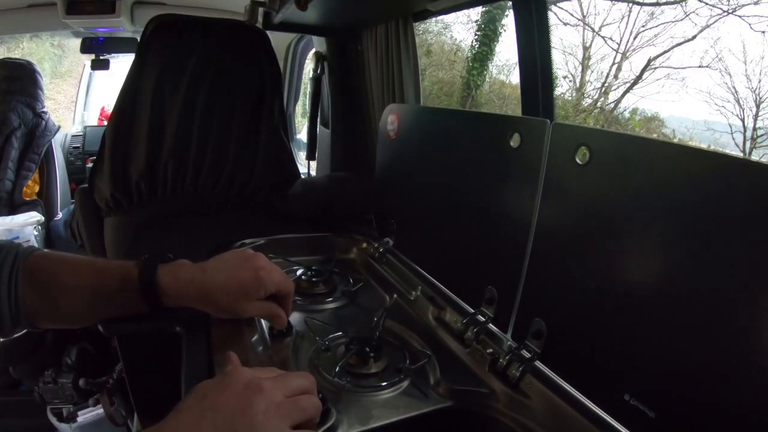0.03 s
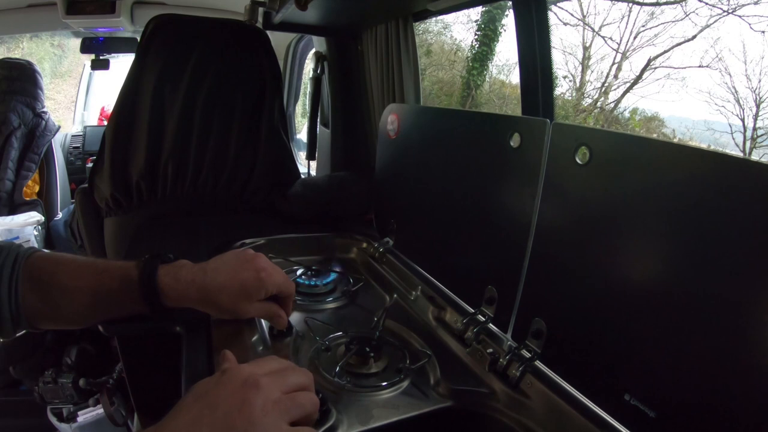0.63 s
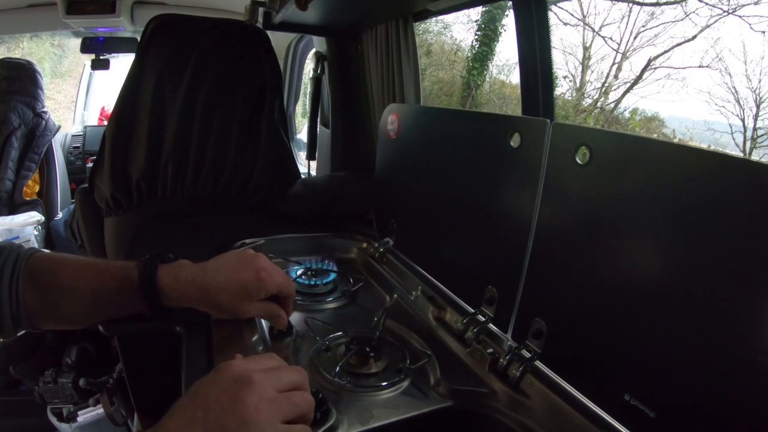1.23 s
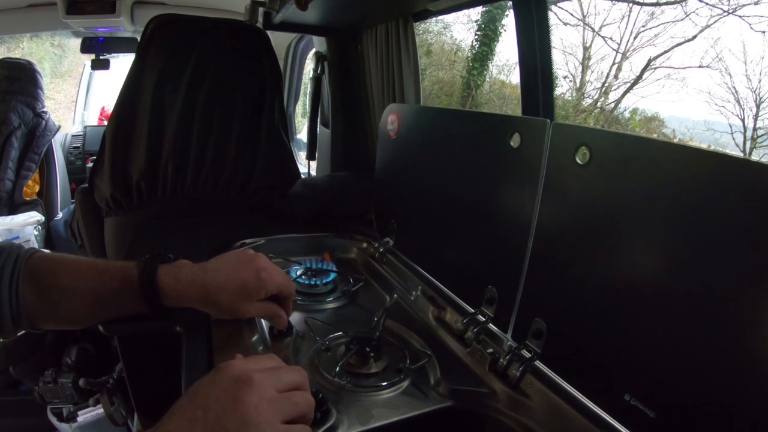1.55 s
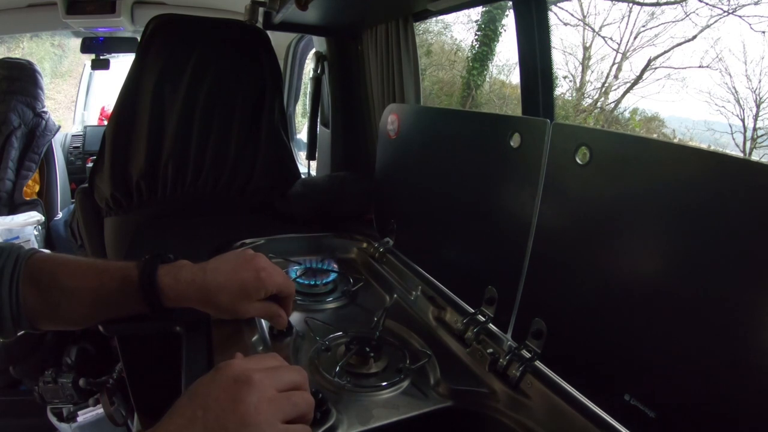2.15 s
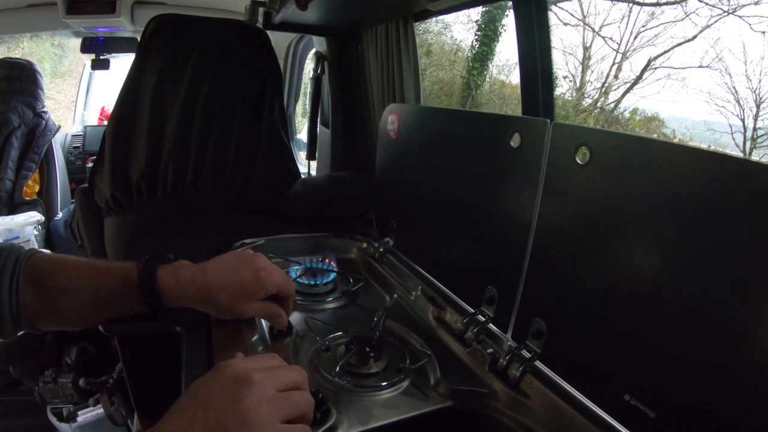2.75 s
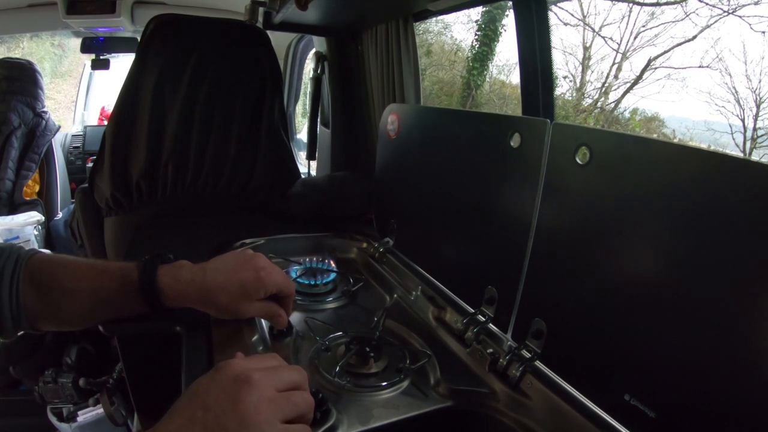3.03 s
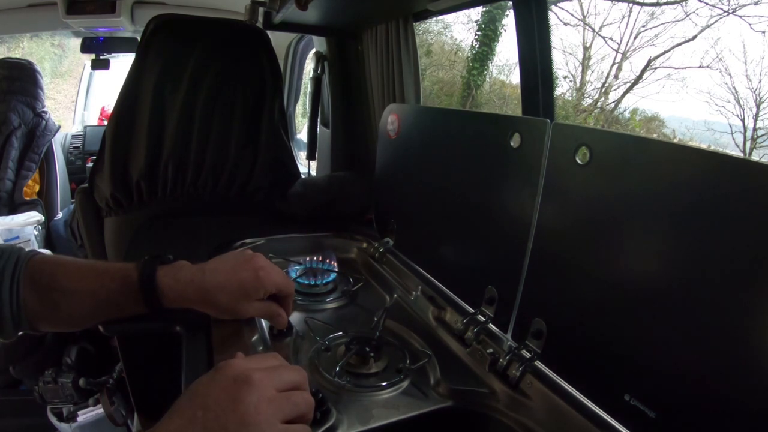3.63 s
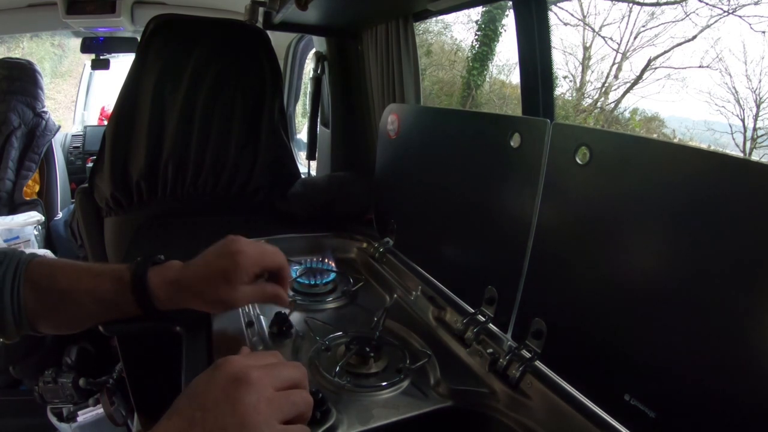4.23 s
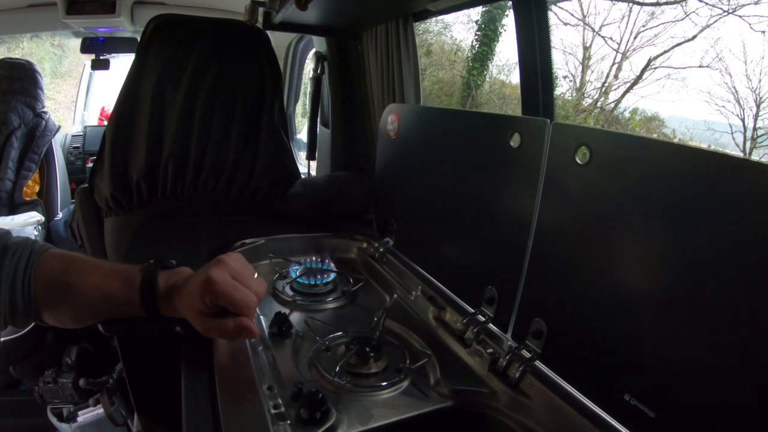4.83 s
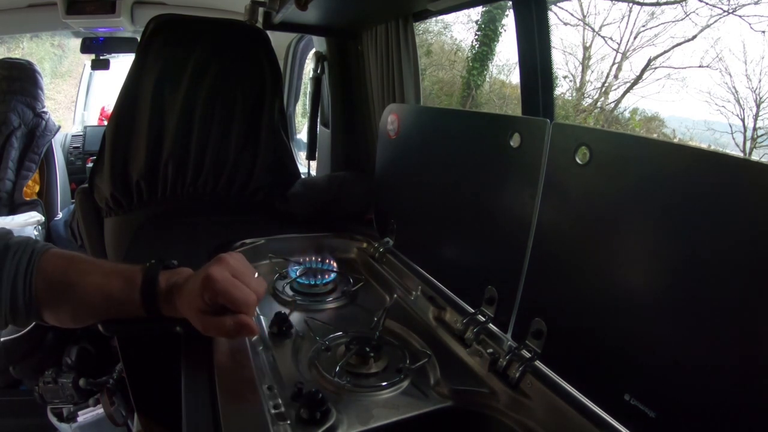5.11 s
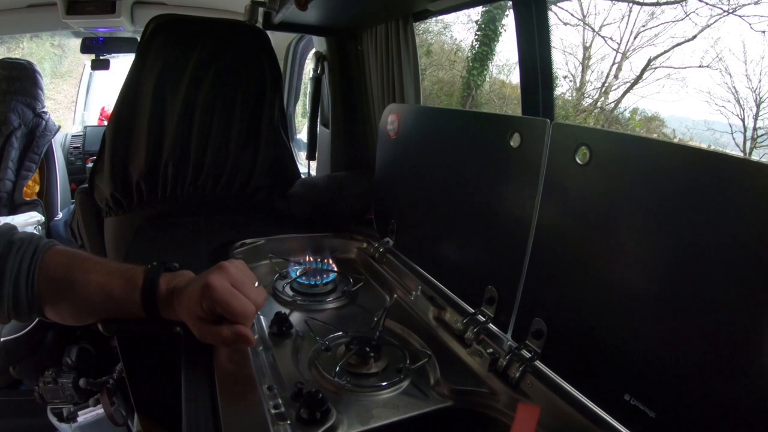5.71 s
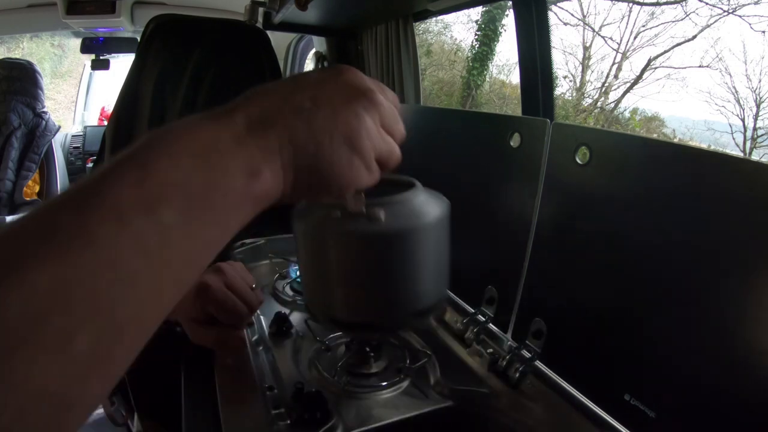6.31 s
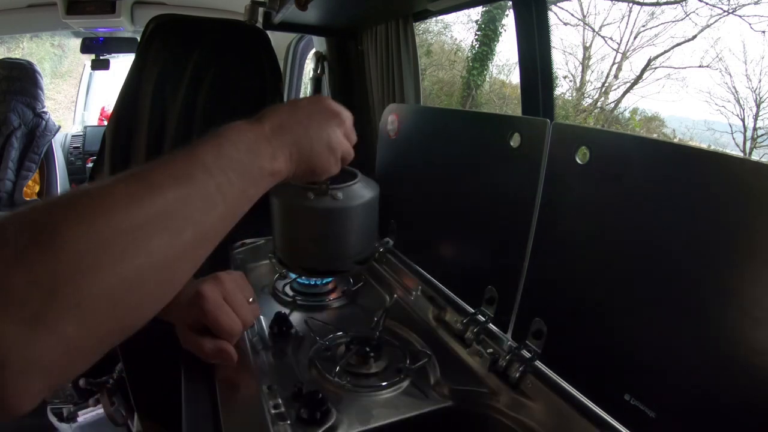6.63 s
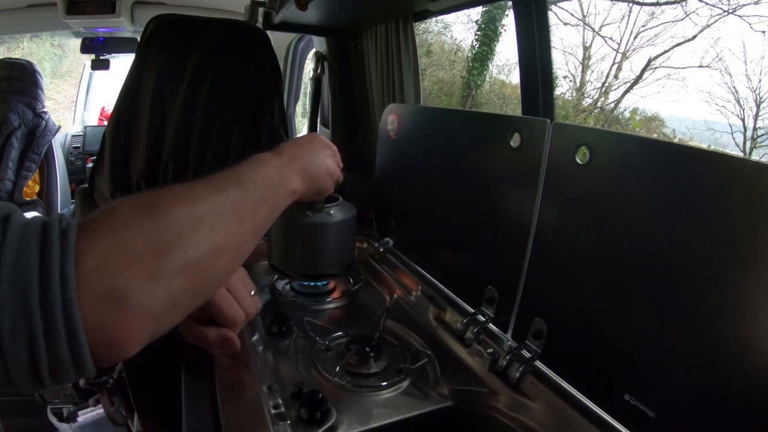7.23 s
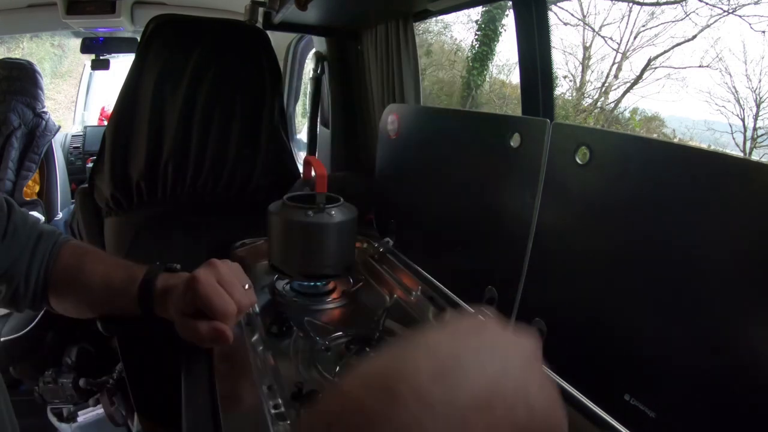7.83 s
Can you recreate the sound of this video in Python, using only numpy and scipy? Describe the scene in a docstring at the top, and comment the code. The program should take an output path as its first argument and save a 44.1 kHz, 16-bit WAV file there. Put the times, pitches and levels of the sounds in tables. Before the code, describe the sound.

Inside a parked van, a gas hob's igniter rasps and snaps loudly, then again more softly, ringing the steel top. The flame catches with dull pops and settles into a quiet hiss. A small bird repeats a faint two-note call outside. Close by on the right, a kettle is dragged, bumps twice and lifts with a wobbling metallic ring, then clatters down on the pan support.

```python
"""Lighting a gas hob in a van

Inside a parked van the igniter's spring rasps and snaps, and the steel hob top rings.
The flame pops as it catches, then settles to a hiss. A kettle of water is dragged closer on the
right, bumps the hob as it is lifted, rings with a wobble as the water sloshes, and clatters down
on the pan support. Small birds sing outside."""
import sys
import numpy as np
from scipy import signal
from scipy.fft import rfft, irfft, next_fast_len
from scipy.io import wavfile

SR = 44100
rng = np.random.default_rng(int(sys.argv[2]) if len(sys.argv) > 2 else 0)


def digitize_waveform(pressure):
    """Quantize a signal to 16-bit integers and store it at the path in sys.argv[1].

    Rows of a 2-D input are taken as channels; values are limited to [-1, 1].
    """
    field = np.atleast_2d(pressure).T
    bounded = np.clip(field, -1, 1)
    quanta = np.round(bounded * 32767).astype(np.int16)
    wavfile.write(sys.argv[1], SR, quanta)


N = 351477
T, CLOCK = np.arange(SR) / SR, np.arange(N) / SR  # seconds within one hit, and through the scene

# knocks: (time [s], clack [dB], thud [dB], thud pitch [Hz], treble tilt [dB/octave], ring [dB])
IGNITER_HITS = [(0.002, -33, -40.5, 172, -8, -48), (0.222, -45, -62, 200, -3.5, -72),
                (0.4625, -10.5, -12, 172.1, -1, -23.5), (0.477, -25.5, -20, 125, 2.5, -37),
                (0.689, -24.5, -43.5, 171, -1.5, -54), (0.6945, -20.5, -26.5, 125.1, -5.5, -33),
                (0.716, -34, -45, 170, -6, -37)]
KNOB_HITS = [(4.143, -56, -41, 176, -6.5, -71), (4.238, -53.5, -41.5, 159, -0.5, -64),
             (4.363, -55.5, -52, 191, 1, -72), (4.447, -49.5, -47, 194, 2, -64),
             (4.465, -50, -44.5, 410, -1, -74), (4.772, -51, -43.5, 130, 0.5, -58.5)]
DRAG_JOLTS = [(5.031, -62, -35.5, 185, 0, -67), (5.170, -48, -33, 188, 0, -62),
              (5.263, -43, -35, 170, -6, -49), (5.302, -48, -36, 210, -5, -58),
              (5.5235, -22.5, -36, 250, 0, -31)]
LEAD_IN_AND_BUMPS = [(5.862, -46, -48, 400, -7, -54), (5.8743, -16.5, -20, 195, -1.5, -35),
                     (5.9625, -17.5, -19, 205, -1.5, -37)]  # a faint, dull lead-in, then the kettle's two bumps
LANDING_HITS = [(7.031, -51, -46.5, 445, -6, -54.5), (7.0955, -25, -23.5, 165.6, 0.5, -38.5),
                (7.116, -37, -31, 178, -3, -46), (7.178, -32.5, -31, 178.3, -2, -41),
                (7.3035, -22.5, -27, 165, 2, -38), (7.326, -37, -31, 185, -1, -48),
                (7.3572, -22.5, -25.5, 83.5, 0, -35), (7.391, -31.5, -28.5, 102, -1, -49),
                (7.44, -51, -33, 85, 7, -74), (7.593, -53, -42.5, 156, -1, -65),
                (7.742, -57, -50.5, 189, -8, -65)]
# soft thumps as the knob is pushed in: (time [s], level [dB], pitch [Hz], rise [s])
PRESSES = [(.2595, -25, 189, 0.0043), (.279, -30, 171, .007), (.322, -27.5, 178, .011)]
# rubbing that swells until it lets go: (time [s], length [s], final level [dB])
SPRING_RASPS = [(0.416, .045, -11.7), (0.669, .021, -27)]
BASE_SCRAPE = (5.867, 0.092, -22)
# the hand brushing the knob and shoving the kettle: (time [s], length [s], level [dB])
BRUSHES = [(.322, .04, -52), (4.205, .045, -62.5), (4.285, 0.033, -59.5), (4.405, 0.068, -59.5)]
SHOVES = [(4.755, 0.052, -48.5), (4.86, 0.27, -49), (5.144, .19, -38), (5.348, 0.2, -34.2)]
# tone colour of knocks, rubbing and the shaking cabinet: (frequency [Hz], level [dB])
SNAP = [(40, -50), (150, -29), (250, -1), (318, -10), (425, -2.5), (589, -21), (774, -4.5), (1000, -5),
        (1700, -9), (2800, -11), (4600, -13.5), (6150, -26), (8520, -23.5), (9610, -41), (15000, -54)]
BUMP = [(40, -40), (150, -22), (260, -3), (430, -3), (570, -11), (740, 0), (1200, -5.5), (2700, -13.5),
        (4200, -12.5), (7200, -15.5), (10000, -26.5), (11500, -40), (15000, -48.5)]
CLANK = [(150, -26), (250, 2), (411, -9), (540, 0.5), (900, -2.5), (1190, -9), (1850, -10.5), (2700, -13),
         (3200, -7.5), (4520, -6), (6150, -4.5), (9500, -22.5), (11500, -44), (15000, -53)]
DRAG = [(40, -6), (150, -14), (280, -4), (520, -8), (850, -11.5), (1350, -3.5), (2000, -5), (3200, -14.5),
        (5600, -7), (9600, -20), (11500, -38), (15000, -47)]
JUDDER = [(20, -18), (45, -7), (100, -10), (180, 0), (300, -6), (500, -17), (1500, -70)]
# short resonances of the struck parts: (pitch [Hz], width [Hz], level [dB])
SNAP_PEAKS = [(780, 98, -3), (1450, 30, -7), (1729, 52, -8), (2480, 80, -11), (3525, 50, -5),
              (4085, 40, -4), (4930, 60, -5), (7900, 42, -17), (8570, 40, -14)]
BUMP_PEAKS = [(1410, 35, -7), (1850, 35, -1), (2280, 60, -4), (2960, 40, -6), (3465, 45, -1)]
CLANK_PEAKS = [(924, 45, 4.5), (1510, 41, -3), (4130, 28, -3), (4980, 40, -8)]
# modes, the notes metal rings at; t60 is the time to fade 60 dB: (pitch [Hz], level [dB], t60 [s])
HOB_MODES = [(118.5, -4, .45), (179, 4.5, .25), (418.7, 1, .17), (662, -1.5, .68), (768, -3, .38),
             (806, -8.5, .85), (888, -13.5, .85), (980, -6, .13), (1078, -10, .5), (1281, -17, .45),
             (1739, -5, .11), (1905, -17, .3), (2229, -27, .55), (2772, -28, .5), (3580, -27, .42)]
SUPPORT_MODES = [(80, .5, .7), (178.4, 4, .25), (335, -3, .24), (670, -6, .25), (933, -1, .3),
                 (1495, -6.5, .24), (1850, -7, .2), (3671, -5, .2), (4350, -8, .22), (4625, -9, .19),
                 (6050, -2, .12)]
KETTLE_ON_HOB_MODES = [(641, -8, .24), (1410, -2.5, .19), (1700, -4, .1), (1940, 2, .09), (2350, -1.5, .19),
                       (4030, -10, .12), (4620, -8, .11), (5570, -6, .17)]
# the lifted kettle's walls: (pitch [Hz], level [dB], t60 [s], swing [Hz], time of top pitch [s])
WALL_MODES = [(1400, -41, 1.1, 115, 6.30), (1680, -31, .24, 70, 6.08), (1930, -29.5, .38, 150, 6.11),
              (2400, -47, .75, 35, 6.15), (3360, -41, .34, 60, 6.17), (4190, -45, .32, 60, 6.02),
              (5200, -44, .18, 30, 6.02)]

# dull pops and sharp spits of the catching flame: (time [s], level [dB])
POPS = [(0.508, -22), (0.548, -24.5), (0.618, -28.5), (0.733, -27), (0.798, -31), (0.840, -28.5),
        (0.875, -28), (0.897, -35.5), (0.934, -27.5), (1.000, -34.5), (1.030, -32), (1.062, -40)]
SPITS = [(.842, -37), (.875, -43), (.901, -43.5), (.9425, -42), (1.002, -42), (1.032, -44)]
# tone colour of the burner's three noises: (frequency [Hz], level [dB])
ROAR = [(12, -54), (20, -21.5), (32, -25), (65, -10), (102, -16.5), (160, 1), (211, -4), (270, -23),
        (450, -41), (990, -120)]
HISS = [(190, -36.5), (330, -11.5), (450, -16), (611, -16), (729, -2.5), (977, -12), (1680, 4.5),
        (1890, 1.5), (2950, -13), (3550, -5.5), (4060, -9), (5200, -22.5), (9640, -38.5), (11000, -46),
        (14300, -80), (22000, -120)]
FIZZ = [(3200, -9), (6300, -1), (7400, -7), (9500, -2), (10800, -25.5), (15000, -32)]
# roar, hiss, fizz: (base level [dB], change once settled [dB], when screened [dB], when covered [dB])
FLAME_LEVELS = [(-53.5, -5.5, -5.5, -2), (-61.2, .5, -2.5, 3), (-86.5, 15, -4, 3)]
# the hiss and fizz dip after the loud snap, then recover: (time [s], level change [dB])
HISS_DUCKING = [(0, 7), (.4, 6), (1.1, -5), (1.6, 1), (2.6, -0.5)]
# thin whistles of the cold jet: (time [s], length [s], pitch [Hz], width [Hz], level [dB])
JET_WHISTLES = [(.75, 1.3, 7760, 160, -91), (.8, 1.4, 8750, 110, -95), (.4, 3.4, 3500, 200, -78)]

# one bird's two-note calls: (time [s], second note's pitch [Hz], relative level [dB])
CALLS = [(2.835, 2952, -48), (3.297, 3076, -42.5), (3.832, 3090, -41), (4.402, 3070, -42.5),
         (4.95, 3100, -41)]
# other birds' notes: (time [s], pitch [Hz], relative level [dB], length [s])
FALLING_NOTES = [(s, 5130, -72, .087) for s in (2.875, 3.02, 3.18, 3.33, 3.505)]
WHISTLE_NOTES = [(1.58, 4030, -62, 0.045), (2.23, 4340, -54, .09), (2.48, 4050, -58, 0.079)]
BUZZ_NOTES = [(1.49, 3500, -67, .06), (1.62, 3570, -63, .065), (1.78, 3900, -65, .06),
              (6.18, 3570, -51, .1), (6.52, 5240, -56.5, .06), (6.753, 3490, -43, 0.081)]

# how long sound lingers in the van: (frequency [Hz], t60 [s])
CABIN_DECAY = [(150, 0.39), (400, .14), (1000, .24), (2500, 0.35), (5000, .2), (9000, 0.068), (15000, .14)]
# how alike left and right are: (frequency [Hz], likeness [0-1])
LIKENESS = [(100, 0.7), (400, 0.9), (800, 0.5), (1500, 0.3), (5000, .35), (10000, 0.1)]
# stereo spread, mono at first: (time [s], width [0-1])
STEREO_WIDTH = [(1.3, 0), (3.0, 1)]


def igniter():
    """The knob goes in; the spring rasps, snaps and bounces back; later the hand brushes away."""
    sound = knocks(IGNITER_HITS, SNAP, SNAP_PEAKS, HOB_MODES, peak_db=6, hold_s=.0057, fall_s=.007,
                   tail_db=-14.5, clunk_db=-8, clunk_hz=743.8, thud_rise_s=.0041, boom_db=-5.5)
    sound += knocks(KNOB_HITS, SNAP, (), HOB_MODES, peak_db=0, hold_s=.0057, fall_s=.01,
                    tail_db=-6, clunk_db=-7, clunk_hz=420, thud_rise_s=.0049, boom_db=-5)
    loading = swells(SPRING_RASPS, power=3.1, stop_db_per_s=1800)
    sound += rub(loading, SNAP, SNAP_PEAKS, peak_db=11, tilt_db=2.5, grain_db=1.5, grain_hz=500)
    brushing = strokes(BRUSHES, rise_s=.017, sag_db_per_s=30, stop_db_per_s=300)
    sound += rub(brushing, DRAG, tilt_db=1, grain_db=2, grain_hz=250)
    for s, db, hz, rise_s in PRESSES:
        add(sound, s, amp(db) * thud(hz, rise_s, boom_db=-13.5, boom_t60=.44))
    return sound


def flame_catching(first_hz=122, last_hz=174):
    """The flame pops and spits as it runs round the ring; the pops climb in pitch as it settles."""
    sound = np.zeros((2, N))
    for s, db in POPS:
        progress = (s - POPS[0][0]) / (POPS[-1][0] - POPS[0][0])
        hz = first_hz + (last_hz - first_hz) * progress ** 4.2
        add(sound, s, amp(db) * thud(hz, rise_s=.005, boom_db=-4, boom_t60=.2))
    spit_shape = np.exp(-T / .006) * (1 - np.exp(-T / .001))
    for s, db in SPITS:
        add(sound, s, amp(db) * spit_shape * noise(SNAP, SR, tilt_db=-4.5))
    return sound


def burner(settle_from_s=1.35, pass_s=6.3, cover_s=6.62):
    """The gas jet hisses and whistles; the roar eases; a high fizz fades in as the stereo opens."""
    settled = 1 - np.exp(-since(settle_from_s) / .85)
    screened = np.exp(-((CLOCK - pass_s) / .3) ** 2)  # the kettle passes in front
    covered = 1 - np.exp(-since(cover_s) / .08)  # the kettle is over the flame
    roar_db, hiss_db, fizz_db = (db + settle_db * settled + screen_db * screened + cover_db * covered
                                 for db, settle_db, screen_db, cover_db in FLAME_LEVELS)
    duck_db = curve(HISS_DUCKING)
    sound = amp(roar_db + 2 * wander(N, 12)) * noise(ROAR, N)
    sound += amp(hiss_db + duck_db + .6 * wander(N, 15)) * noise(HISS, N)
    sound += amp(fizz_db + duck_db) * noise(FIZZ, N)
    spreading = covered * amp(-57 - 22 * since(cover_s))  # the flame fans out under the base
    sound += spreading * noise(DRAG, N, tilt_db=-3)
    for s, length, hz, width, db in JET_WHISTLES:
        n = round(length * SR)
        add(sound, s, amp(db) * signal.windows.tukey(n) * fuzzy_tone(hz, width, n))
    return sound


def kettle_dragged():
    """The kettle jolts and rubs over the steel, which keeps it ringing and shakes the cabinet."""
    sound = knocks(DRAG_JOLTS, BUMP, (), KETTLE_ON_HOB_MODES, peak_db=0, hold_s=.0058, fall_s=.011,
                   tail_db=-7.5, clunk_db=-2.5, clunk_hz=627, thud_rise_s=.0052, boom_db=-3.5)
    shoving = strokes(SHOVES, rise_s=.07, sag_db_per_s=38, stop_db_per_s=298)
    sound += amp(-32.5) * shoving ** .35 * noise(JUDDER, N)  # rumble grows more slowly than rubbing
    sound += rub(shoving, DRAG, grain_db=1, grain_hz=200)
    ringing = np.zeros(N)
    for hz, db, _ in KETTLE_ON_HOB_MODES:  # each bends and swells as the contact shifts
        tone = fuzzy_tone(hz * (1 + .011 * wander(SR, 12)), width_hz=55, n=SR)
        add(ringing, SHOVES[0][0], amp(db + 3 * wander(SR, 12)) * tone)
    return sound + amp(-7.5) * shoving * ringing


def kettle_lifted(lift_s=5.9625, nearest_s=6.11, slosh_period_s=.36):
    """After a faint, dull lead-in the kettle bumps and scrapes; water bends the ring of its walls."""
    # the kettle's weight stiffens the top and shortens its ring
    pressed = [(1.035 * hz, db, .8 * t60) for hz, db, t60 in HOB_MODES]
    sound = knocks(LEAD_IN_AND_BUMPS, BUMP, BUMP_PEAKS, pressed, peak_db=3, hold_s=.0055, fall_s=.0091,
                   tail_db=-7, clunk_db=-2, clunk_hz=760, thud_rise_s=.0042, boom_db=-3.5)
    tipping = swells([BASE_SCRAPE], power=.99, stop_db_per_s=552)
    sound += rub(tipping, BUMP, BUMP_PEAKS, peak_db=7.5, tilt_db=.5, grain_db=2, grain_hz=402)
    near_db = 6 * np.exp(-((lift_s + T - nearest_s) / .06) ** 2)  # it swings past the listener
    for hz, db, t60, swing_hz, crest_s in WALL_MODES:
        pitch = hz + swing_hz * np.cos(2 * np.pi * (lift_s + T - crest_s) / slosh_period_s)
        add(sound, lift_s, amp(db + near_db - 60 * T / t60) * sine(pitch))
    return sound


def kettle_set_down():
    """The base lands on the pan support, clatters from arm to arm and settles."""
    return knocks(LANDING_HITS, CLANK, CLANK_PEAKS, SUPPORT_MODES, peak_db=4, hold_s=.0056,
                  fall_s=.0081, tail_db=-2.5, clunk_db=-14, clunk_hz=393, thud_rise_s=.0096,
                  boom_db=-1, shifting=True)


def birds(cabin_db=-7, cabin_t60=.1, trees_db=-8, trees_t60=.63):
    """Song comes in through the open door, bounces round the cabin and echoes among the trees."""
    direct = two_note_calls()
    direct += song(FALLING_NOTES, glide=-.054, arch=-.036, fade=.35, quiver=.0082, quiver_hz=200)
    direct += song(WHISTLE_NOTES, glide=.018, arch=.022, fade=.27, quiver=.0075, quiver_hz=200)
    direct += song(BUZZ_NOTES, glide=-.135, arch=.09, fade=.57, quiver=.05)
    t60 = np.array([cabin_t60, trees_t60])[:, None, None]
    tails = rng.standard_normal((2, 2, SR)) * amp(-60 * T / t60)
    tails /= np.linalg.norm(tails, axis=2, keepdims=True)
    echo = amp(cabin_db) * tails[0] + amp(trees_db) * tails[1]
    return .62 * direct + signal.fftconvolve(direct[None], echo, axes=1)[:, :N]


def two_note_calls(first_s=.068, second_s=.086, delay_s=.079):
    """A low note, then a higher one; the voice box's other side adds a faint tone to the first."""
    first = [(s, .905 * hz, db - 2, first_s) for s, hz, db in CALLS]
    upper = [(s, 1.45 * hz, db - 23, length) for s, hz, db, length in first]
    second = [(s + delay_s, hz, db, second_s) for s, hz, db in CALLS]
    return song(first + upper, glide=-.035, arch=.16) + song(second, glide=.04, arch=.2)


def song(notes, glide, arch, fade=.5, quiver=.013, quiver_hz=250):
    """One bird: nearly pure notes that slide, arch and quiver in pitch, each fading in and out."""
    out = np.zeros(N)
    for s, hz, db, length in notes:
        t = np.arange(0, length, 1 / SR)
        along = 2 * t / length - 1
        pitch = hz * (1 + glide * along - arch * along ** 2)
        pitch *= 1 + quiver * wander(len(t), quiver_hz)
        add(out, s, amp(db) * signal.windows.tukey(len(t), fade) * np.sqrt(2) * sine(pitch))
    return out


def knocks(rows, colour, peaks, modes, peak_db, hold_s, fall_s, tail_db, clunk_db, clunk_hz,
           thud_rise_s, boom_db, shifting=False):
    """Each knock: a clack, a metallic tail, a worktop clunk, a cabinet thud and ringing steel."""
    out = np.zeros((2, N))
    for s, db, thud_db, thud_hz, tilt_db, ring_db in rows:
        burst = noise(colour, SR, peaks, peak_db, tilt_db)
        clack = burst * np.exp(-np.maximum(T - hold_s, 0) / fall_s)
        clack += amp(tail_db) * cabin(lesser_modes(burst)) * (1 - np.exp(-T / fall_s))
        clack += amp(clunk_db - tilt_db) * panel(clunk_hz, rise_s=.0018)  # duller knocks clunk more
        steel = ring(new_contact(modes) if shifting else modes)
        cabinet = thud(thud_hz, thud_rise_s, boom_db, boom_t60=.28)
        add(out, s, amp(db) * clack + amp(thud_db) * cabinet + amp(ring_db) * steel)
    return out


def ring(modes):
    """Ringing steel, a little different left and right; each mode beats with a weaker, shorter twin."""
    out = np.zeros((2, SR))
    for hz, db, t60 in modes:
        phase = rng.uniform(0, 2 * np.pi) + .5 * rng.standard_normal((2, 1))
        twin_hz = hz + rng.choice([-1, 1]) * rng.uniform(10, 35)
        twin = .5 * amp(-20 * T / t60) * np.sin(2 * np.pi * twin_hz * T - phase)
        out += amp(db - 60 * T / t60) * (np.sin(2 * np.pi * hz * T + phase) + twin)
    return (1 - np.exp(-T / .0037)) * out


def new_contact(modes):
    """Touching at a new spot retunes the modes a little and favours different ones."""
    return [(hz * rng.uniform(.965, 1.035), db + rng.uniform(-6, 4), t60) for hz, db, t60 in modes]


def lesser_modes(burst, lowest_hz=300, slot_hz=120, share=.75):
    """Gathers the metal's share of a burst into scattered tones, one in each narrow slot of pitch."""
    slots = np.arange(lowest_hz, SR // 2 - slot_hz, slot_hz)
    power = np.where(np.arange(SR // 2 + 1) < lowest_hz, 1, 1 - share)
    power[slots + rng.integers(0, slot_hz, len(slots))] += share * slot_hz
    return irfft(rfft(burst) * np.sqrt(power), SR)


def thud(hz, rise_s, boom_db, boom_t60):
    """A low push on a panel, followed by the boom of the cabin."""
    boom = noise([(25, -26), (55, -9.5), (90, -4), (190, .5), (280, -12), (450, -19.5),
                  (9000, -90.5)], SR)
    return panel(hz, rise_s) + amp(boom_db - 60 * T / boom_t60) * (1 - np.exp(-T / rise_s)) * boom


def panel(hz, rise_s):
    """A heavily damped panel swings a few times and stops."""
    return T / rise_s * np.exp(1 - T / rise_s) * np.sin(2 * np.pi * hz * T) * np.sqrt(2)


def rub(strength, colour, peaks=(), peak_db=0, tilt_db=0, *, grain_db, grain_hz):
    """Sliding surfaces grip and let go; tiny uneven slips make the noise grainy."""
    grip_db = wander(N, 45)
    friction = noise(colour, N, peaks, peak_db, tilt_db)
    return strength * friction * unit(amp(grip_db + grain_db * wander(N, grain_hz)))


def strokes(rows, rise_s, sag_db_per_s, stop_db_per_s):
    """Each push builds up, eases off while it lasts and dies quickly when it stops."""
    return sum(np.clip((CLOCK - s) / rise_s, 0, 1)
               * amp(db - sag_db_per_s * since(s + rise_s) - stop_db_per_s * since(s + length))
               for s, length, db in rows)


def swells(rows, power, stop_db_per_s):
    """Pressure grows on a contact until it lets go."""
    return sum(np.clip((CLOCK - s) / length, 0, 1) ** power * amp(db - stop_db_per_s * since(s + length))
               for s, length, db in rows)


def cabin(x):
    """A burst dies away band by band, as sound does between the van's walls."""
    hz, spectrum = np.fft.rfftfreq(SR, 1 / SR), rfft(x)
    centres, t60s = np.transpose(CABIN_DECAY)
    bands = [value_at(list(zip(centres, row)), hz) for row in np.eye(len(centres))]
    return sum(irfft(spectrum * band, SR) * amp(-60 * T / t60) for band, t60 in zip(bands, t60s))


def place(x, pan_db, lag_ms=0):
    """A sound on the right is weaker, and can be later, on the left; bass bends round to both sides."""
    size = next_fast_len(N + 100, True)
    hz = np.fft.rfftfreq(size, 1 / SR)
    shade = hz ** 2 / (hz ** 2 + 350 ** 2) / (1 + (hz / 12000) ** 2)
    left = amp(pan_db * shade / 2) * np.exp(-2j * np.pi * hz * lag_ms / 1000)
    right = amp(-pan_db * shade / 2)
    return irfft(rfft(x, size) * np.array([left, right]), size)[:, :N]


def noise(colour, n, peaks=(), peak_db=0, tilt_db=0):
    """Stereo noise of a given tone colour, with any narrow resonances standing out of it."""
    size = next_fast_len(n, True)
    hz = np.fft.rfftfreq(size, 1 / SR)
    mid, side = rfft(rng.standard_normal((2, size)))
    alike = np.clip(value_at(LIKENESS, hz), 0, 1)
    pair = np.sqrt(1 + alike) * mid + np.array([[1], [-1]]) * np.sqrt(1 - alike) * side
    lift = sum(amp(peak_db + db / 2) / (1 + ((hz - f) / (width / 2)) ** 2) for f, width, db in peaks)
    octaves = np.log2(np.maximum(hz, 500) / 2000)
    db = value_at(colour, hz) + tilt_db * octaves
    if len(peaks):  # a metal part's countless lesser modes ripple its treble
        grid = np.arange(0, SR / 2, 55)
        db += 4.5 * hz / (hz + 1200) * np.interp(hz, grid, rng.standard_normal(len(grid)))
    return unit(irfft(pair * amp(db) * (1 + lift), size)[:, :n])


def fuzzy_tone(hz, width_hz, n):
    """A resonance kept going by noise: a blurred tone around the pitch hz."""
    phase = 2 * np.pi * np.cumsum(hz * np.ones(n)) / SR
    return unit(wander(n, width_hz / 2) * np.cos(phase) + wander(n, width_hz / 2) * np.sin(phase))


def sine(pitch):
    """A pure tone that follows a changing pitch."""
    return np.sin(2 * np.pi * np.cumsum(pitch) / SR)


def wander(n, hz):
    """A random wobble, mostly slower than hz."""
    spectrum = rfft(rng.standard_normal(n))
    return unit(irfft(spectrum / (1 + (np.fft.rfftfreq(n, 1 / SR) / hz) ** 4), n))


def amp(db):
    """Decibels to gain."""
    return 10 ** (np.asarray(db) / 20)


def unit(x):
    """Scales a signal to an average strength (rms) of 1."""
    return x / np.sqrt(np.mean(x ** 2) + 1e-20)


def value_at(points, hz):
    """Looks up a frequency table, joining its points on a log axis."""
    f, value = np.transpose(points)
    return np.interp(np.log(hz + 1), np.log(f + 1), value)


def curve(rows):
    """A time table's value at every sample."""
    return np.interp(CLOCK, *np.transpose(rows))


def since(s):
    """Seconds gone by since time s, zero before it."""
    return np.maximum(CLOCK - s, 0)


def add(mix, s, sound):
    """Mixes a sound in at time s."""
    part = mix[..., max(round(s * SR), 0):][..., :sound.shape[-1]]
    part += sound[..., :part.shape[-1]]


def scene():
    """The hob, the kettle on the right and the birds together."""
    hob = igniter() + flame_catching() + burner()
    kettle = place(kettle_dragged() + kettle_lifted(), pan_db=-7, lag_ms=.249)
    kettle += place(kettle_set_down(), pan_db=-5)
    return hob + kettle + birds()


def record(dry):
    """The sound opens from mono to stereo; the tallest peaks and the highest treble are cut off."""
    mid = dry.mean(0)
    wide = mid + curve(STEREO_WIDTH) * (dry - mid)
    clipped = np.clip(wide, -.9, .9)
    lowpass = signal.firwin(511, cutoff=15000, window=("kaiser", 9), fs=SR)
    return signal.oaconvolve(clipped, lowpass[None], "same")


dry = scene()
out = record(dry)
digitize_waveform(out)
```